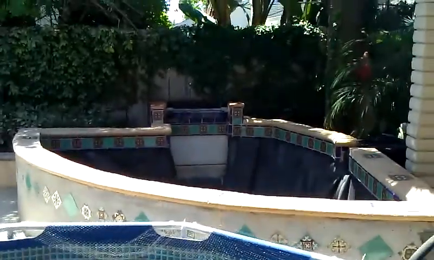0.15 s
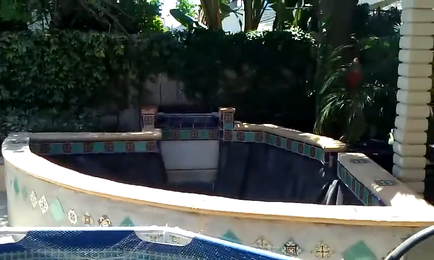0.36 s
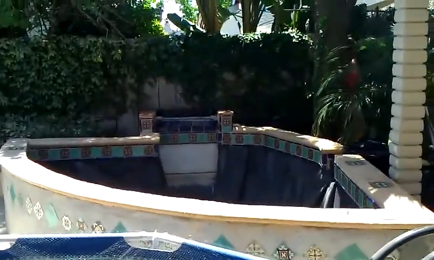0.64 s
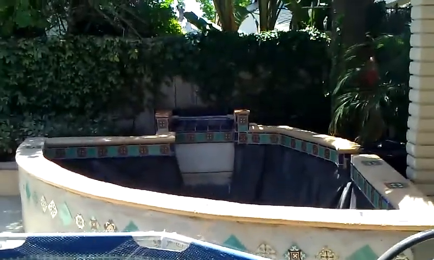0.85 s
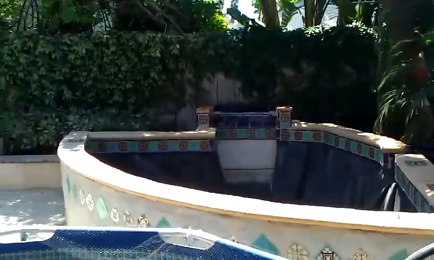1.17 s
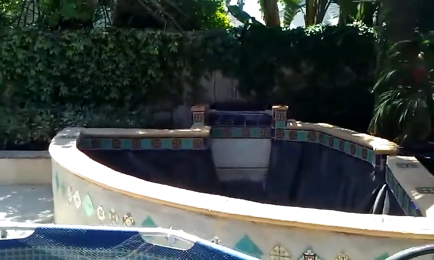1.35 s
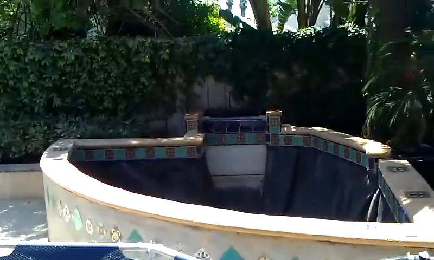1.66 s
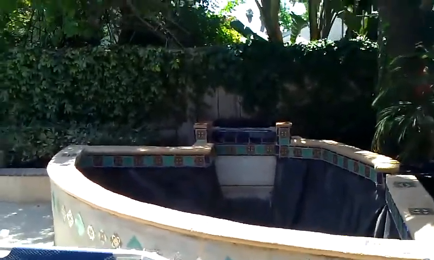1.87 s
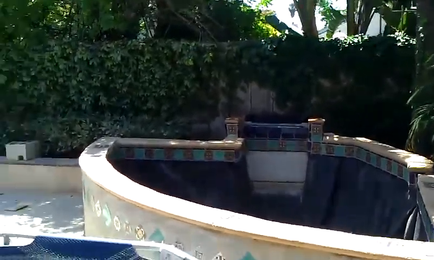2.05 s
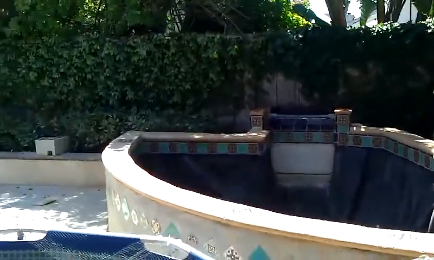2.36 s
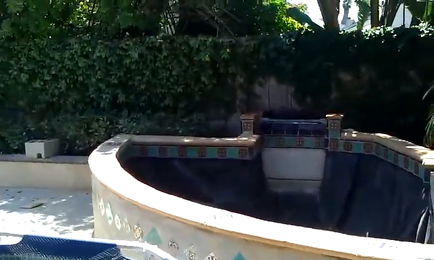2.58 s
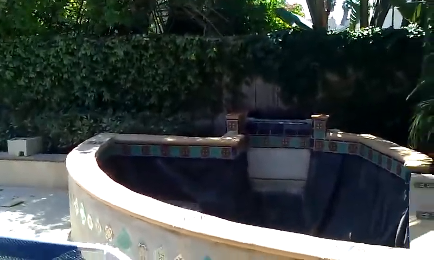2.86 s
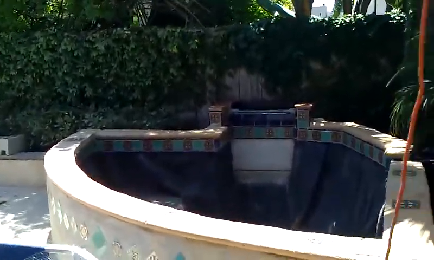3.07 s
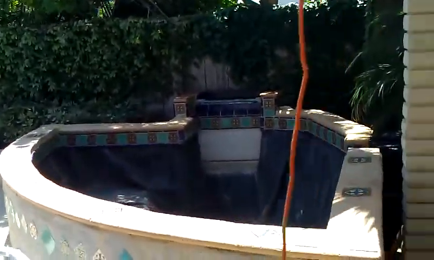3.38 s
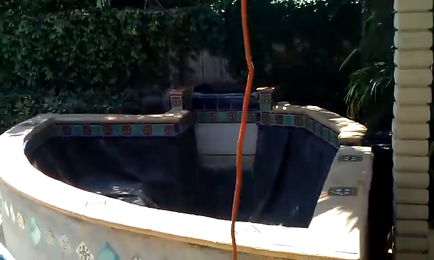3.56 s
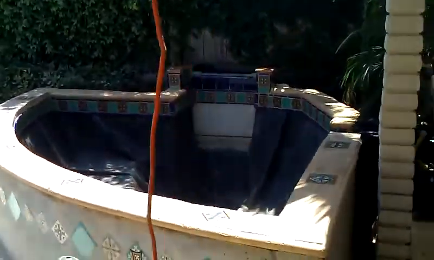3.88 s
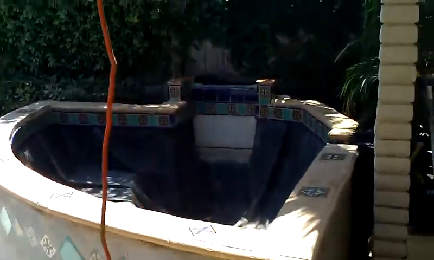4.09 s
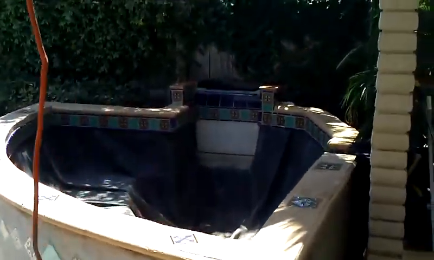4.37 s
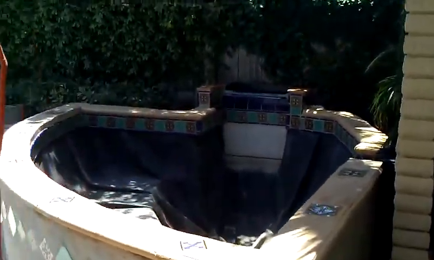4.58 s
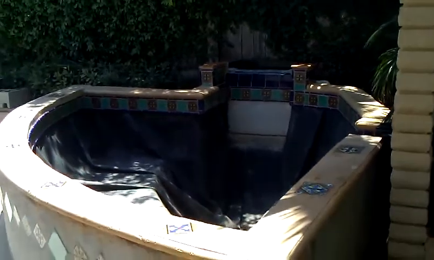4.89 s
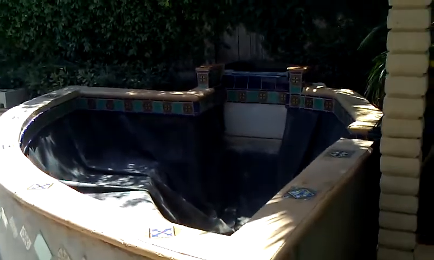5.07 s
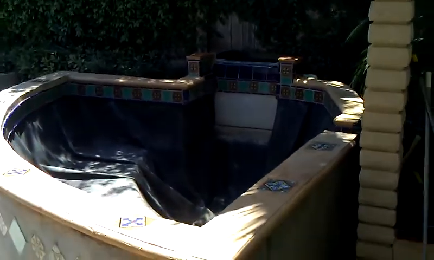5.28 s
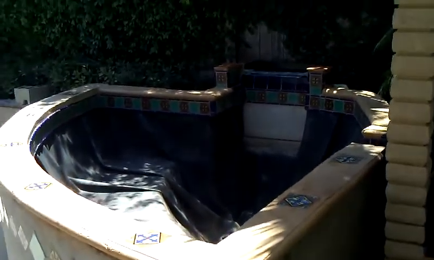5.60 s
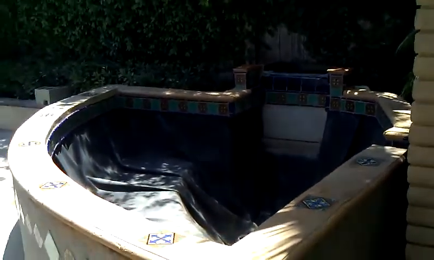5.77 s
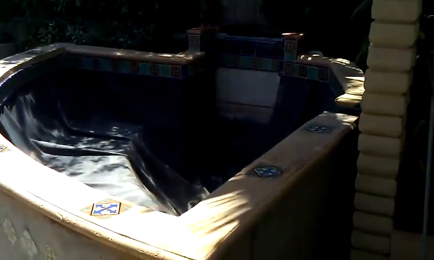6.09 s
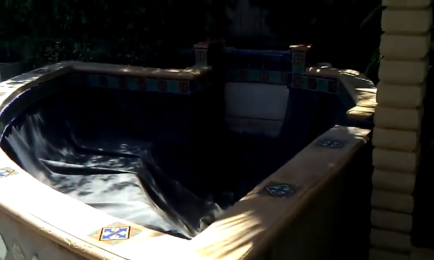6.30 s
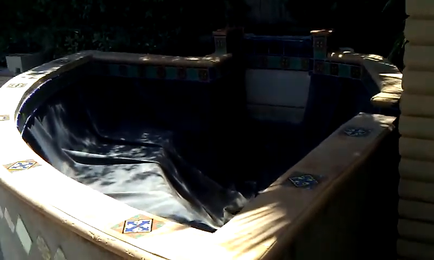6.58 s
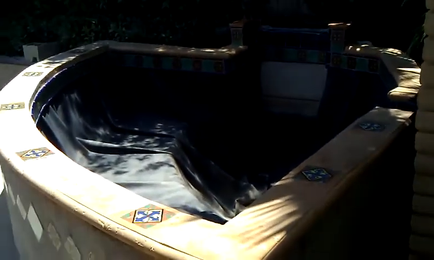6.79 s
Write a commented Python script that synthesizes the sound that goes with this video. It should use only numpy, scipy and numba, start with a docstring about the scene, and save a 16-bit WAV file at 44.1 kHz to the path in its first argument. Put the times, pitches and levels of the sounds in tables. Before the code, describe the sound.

A stream pours into a nearly empty lined garden pond, crackling with droplets and wet slaps over a faint pump hum. Between about one and three seconds, a close bird screeches three times, harsh and overloaded, echoing off patio walls. Slaps continue, a sharp tap sounds near four seconds, then the spatter recedes into softer pouring with plops and gurgles. Handheld microphone, moving.

```python
"""First one hears water pouring and spattering onto the liner of a garden pond while a pump hums.
The water is bubbly noise, showers of tiny fading sines, and bursts of noise for the slaps on the liner.
A parrot-like bird close by screeches three times, as rough harmonics and rasping noise that ring round
the patio and overload the microphone and its limiter. Later a sharp tap and a few fat drops stand out,
made of short ringing tones, and the spatter fades as the listener walks away from it."""
import sys
import numpy as np
from scipy import signal
from scipy.fft import rfft, irfft
from scipy.io import wavfile
from scipy.ndimage import uniform_filter1d
from numba import njit

SR = 44100
rng = np.random.default_rng(int(sys.argv[2]) if len(sys.argv) > 2 else 0)


def dump(signal):
    """Clip the signal to [-1, 1] and save it as 16-bit WAV at the path in sys.argv[1]."""
    limited = np.clip(np.atleast_2d(signal).T, -1, 1)
    pcm = np.round(limited * 32767).astype(np.int16)
    wavfile.write(sys.argv[1], SR, pcm)


N = 306054
TIME = np.arange(N) / SR

# Tone colour of the pouring stream: (frequency [Hz], relative level per Hz [dB])
POUR_COLOUR = [(30, -29), (90, -18), (150, -17.5), (210, -0.5), (350, 2), (520, -0.5), (700, -1),
               (1100, -1), (1800, 3), (2500, -2), (3200, -5), (4200, -3.5), (5600, -15.5), (8000, -33)]
# Tone colour of the spattering drops: (frequency [Hz], relative level per Hz [dB])
SPATTER_COLOUR = [(200, -30.5), (700, -11), (1500, -14.5), (2300, 2.5), (2750, -2), (3150, -1.5),
                  (3700, -1.5), (4250, 4.5), (4900, 0.5), (5700, -9), (6500, 7.5), (8300, -14.5)]
# Tone colour of the fine spray: (frequency [Hz], relative level per Hz [dB])
SPRAY_COLOUR = [(3000, -28.5), (5750, -22.5), (6200, -2.5), (6600, 1.5), (7200, 1), (8000, -3.5),
                (8600, -13)]
# Big slaps of water on the liner:
# (time [s], approximate peak [dB], splash relative to crack [dB], splash pitch [Hz])
SLAPS = [(0.045, -16, -14, 4540), (0.059, -29, -4, 5000), (0.092, -17.5, -8, 4530), (0.156, -14, -27, 4250),
         (0.2035, -15.5, -13, 4760), (0.2773, -16, -3, 4860), (0.32, -22, -19, 2400),
         (0.376, -20.5, -2.5, 3070), (0.4294, -33.5, 8, 4080), (0.441, -30, 8.5, 4850),
         (0.5701, -21, -2.5, 2770), (0.5877, -19.5, -1.5, 2600), (0.6565, -18, -6, 2500),
         (0.672, -23.5, -1, 4600), (0.7128, -31, 7, 2310), (0.729, -27, 1.5, 3400),
         (0.7394, -21.5, 3, 4400), (0.801, -17, -11, 3610), (0.8804, -24.5, 2, 2530),
         (1.0226, -14, -7, 4800), (1.043, -21.5, 1.5, 2560), (1.1478, -25.5, 3, 2040),
         (1.156, -22, -1, 4780), (1.2501, -29, 2, 1840), (1.29, -18.5, -3, 4350), (1.3367, -23, 2.5, 3460),
         (1.8695, -14.5, 0, 3970), (2.756, -11.5, -6.5, 4270), (2.8733, -13, -6.5, 4570),
         (2.9332, -20, -6, 2600), (2.9662, -18.5, -2, 4400), (3.0098, -17.5, -8, 2570),
         (3.0604, -16, -13, 4960), (3.1013, -14, -30, 2100), (3.1652, -12, -9, 4550),
         (3.428, -17, -13, 4400), (3.445, -15.5, -24, 4280), (3.541, -15.5, -16, 4300),
         (3.8664, -17, -11, 4350), (4.0776, -23, -22, 4200), (4.0885, -26, 4, 4230), (4.122, -32, 8, 4360),
         (4.17, -29, 3, 4400), (4.3132, -21.5, -13, 3490), (4.683, -30, -8, 2200),
         (5.172, -28.5, 2.5, 3400)]
# Tone colour of the crack in a slap: (frequency [Hz], relative level per Hz [dB])
CRACK_COLOUR = [(300, -18.5), (1200, -13.5), (2400, -1.5), (3200, -24.5),
                (4400, 2.0), (5600, -10.5), (6700, 8.5), (8300, -4.5)]
# Sharp ticks of drops on the liner, some alone and some within a slap:
# (time [s], level of the main ring [dB], pitch [Hz])
TICKS = [(0.5727, -22, 3050), (0.9757, -21.5, 3700), (1.26, -23.5, 4330), (1.2772, -26, 4300),
         (2.668, -19, 2600), (2.869, -25, 4400), (2.8755, -21, 4470), (2.892, -22, 4500),
         (3.205, -25, 4400), (3.2355, -23, 4400), (3.339, -27, 2380), (3.805, -22, 6660),
         (3.975, -27, 6500), (4.024, -29, 6900), (4.0785, -25, 7300), (4.0895, -20, 4500),
         (4.401, -27.5, 7300)]
# Ringing of the liner in each tick:
# (frequency [Hz], level relative to the main ring [dB], time to fade by 60 dB [s])
LINER_MODES = [(4500, -8, .003), (6900, 3.5, .004), (7600, -6, .003)]
# Screeches: (time [s], length [s], time until the tone locks in [s], time until it sags [s],
# top pitch [Hz], relative level [dB])
SCREECHES = [(1.355, 0.32, 0.067, 0.146, 2180, -0.3), (1.898, 0.313, 0.048, 0.15, 2200, 1.2),
             (2.246, 0.288, 0.036, 0.135, 2172, 1.4)]
# Strong and weak cycles of the voice alternate, adding half harmonics:
# (multiple of the pitch [-], relative level [dB])
SCREECH_HARMONICS = [(1, -22.5), (1.5, -29), (2, -9), (3, -8.5), (3.5, -23.5)]
# Tone colour of the rasp: (frequency [Hz], relative level per Hz [dB])
RASP_COLOUR = [(700, -26), (1600, -11.5), (2200, -3.5), (2700, -5), (3400, 3), (4300, 1), (5000, -0.5),
               (5700, -6), (6400, 1), (7200, 1.5), (8300, -24)]
# Tone colour of the frayed voice: (frequency [Hz], relative level per Hz [dB])
FRAY_COLOUR = [(700, -15), (1600, -11), (2600, -2), (3700, 1), (4900, 5.5), (5350, -6.5), (5650, -12),
               (7000, 5.5), (8100, -3), (8600, -3)]
# Fat drops: (time [s], level [dB], pitch [Hz], time to fade by 60 dB [s])
PLOPS = [(3.266, -27, 960, 0.021), (3.991, -42, 1560, 0.021), (4.38, -22, 760, 0.016),
         (4.423, -31.5, 1300, 0.031), (4.799, -25, 795, 0.018), (5.172, -30, 580, 0.017),
         (6.119, -35, 1520, 0.026), (6.62, -30, 1750, 0.029)]
# Gurgles, short runs of bubbles:
# (time [s], length [s], middle pitch [Hz], level before a boost and random bubble sizes [dB])
GURGLES = [(3.497, 0.045, 1700, -37.5), (4.57, 0.039, 1490, -40), (4.668, 0.051, 2300, -42),
           (4.715, 0.049, 4420, -44), (4.953, 0.055, 2100, -43), (5.028, 0.027, 3280, -40.5),
           (5.274, 0.054, 2760, -45), (5.488, .035, 4350, -43), (5.897, 0.055, 2880, -39),
           (6.097, 0.13, 1850, -43), (6.109, 0.039, 6540, -44), (6.165, 0.098, 3800, -43),
           (6.283, 0.2, 1790, -44), (6.576, 0.068, 3540, -44), (6.583, 0.023, 6850, -42)]
# Modes of the hard tap: (frequency [Hz], relative level [dB], time to fade by 60 dB [s])
TAP_MODES = [(990, -11.5, 0.033), (1630, 0.5, 0.0062), (2110, 0.5, 0.0027), (3030, -2.5, 0.0059),
             (4130, -5, 0.0045), (6700, -4, 0.0032)]
# Pump tones that swell as the listener passes: (frequency [Hz], top level before the ripple [dB],
# loudest at [s], fade to either side [dB/s], a crest of the ripple [s])
PUMP_TONES = [(277, -59.5, 3.9, 2.6, 0.74), (347.5, -57, 5.45, 7, 0.2)]
# Echoes from the basin walls: (delay [s], level [dB])
BASIN_ECHOES = [(.0047, -34.5), (0.0113, -9)]

# hum, and the ripple of the pump tones: wall echoes make standing waves along the walk
MAINS_HZ, MAINS_DB = 124, -75.5
RIPPLE_PERIOD_S, RIPPLE_ECHO = 1.36, .7
# water gains at the start of the walk
POUR_DB, DROPS_DB, SPRAY_DB, PING_DB = -47, -40.5, -48.5, -46.5
# the listener leaves the spatter behind: midpoint and time scale, then the losses
LEAVE_S, LEAVE_SPAN_S = 4.47, 0.75
DROPS_LOSS_DB, SPRAY_LOSS_DB, PING_LOSS_DB = 10, 6.5, 14
# on the way the spray comes into the open: moment and time scale, gain of spray and of pour
OPEN_S, OPEN_SPAN_S, SPRAY_OPEN_DB, POUR_OPEN_DB = 3.24, 0.9, 7, 0.5
# a slap is a short crack inside a patter of droplets
SLAP_RISE_S, SLAP_DECAY_S, PATTER_S, PATTER_DB = 0.0012, 0.0017, 0.0091, -6
# the first droplets land this long before the crack; droplets also make the level grainy
PATTER_LEAD_S, SLAP_GRAIN_DB = .011, 1.8
# small slaps fall at random: strongest peak before the walk's loss, range below it, relative splash level
SMALL_SLAP_DB, SMALL_SLAP_RANGE_DB, SMALL_SPLASH_DB = -25.5, 5.5, -0.5
SPLASH_LOW_HZ, SPLASH_HIGH_HZ = 1900, 4500
# the opening rasp swells, then drops to a trace under the tone
RASP_DB, RASP_GRAIN_DB, RASP_ATTACK_S, RASP_TRACE_DB = -20, 2.4, .07, -35
# the tone swells, tires steadily and is released
TONE_ATTACK_S, TONE_DB, TIRE_DB_PER_S, RELEASE_S = 0.088, 4.5, 25, 0.12
# a screech slides down from its top pitch: depth and duration of the slide
SAG_HZ, SAG_SPAN_S = 125, .1
# as it sags it frays: shreds, a second vibration that shakes the tone, added share of pitch jitter
FRAY_DB, FRAY_GRAIN_DB, BUZZ_HZ, BUZZ_RAD, FRAY_JITTER = -18.5, 4, 700, .12, .8
BUBBLES_PER_S, BUBBLE_OCTAVES = 500, .48
TAP_S, TAP_DB = 3.931, -15.5
# the input stage bends above a knee and flattens toward unequal rails (full scale 1)
KNEE, TOP_RAIL, BOTTOM_RAIL = .38, .67, .53
SCENE_TOP_HZ, TOP_HZ = 8350, 15700


def undb(db):
    """Turn decibels into a gain."""
    return 10 ** (np.asarray(db) / 20)


def unit(x):
    """Scale to an average strength (rms) of 1."""
    return x / np.sqrt(np.mean(x ** 2))


def add(out, s, x):
    """Mix x into out from time s."""
    i = max(int(s * SR), 0)
    out[i:i + len(x)] += x[:N - i]


def ramp(t, span):
    """Rise smoothly from 0 at t = 0 to 1 at t = span."""
    return np.sin(np.pi / 2 * np.clip(t / span, 0, 1)) ** 2


def walk(rate):
    """Wander at random: levels held for 1 / rate seconds, smoothed twice, rms 1."""
    k = max(int(SR / rate), 1)
    held = np.repeat(rng.standard_normal(N)[:N // k + 1], k)
    smooth = uniform_filter1d(uniform_filter1d(held, k), k)
    return unit(smooth[:N])


def colour(x, points):
    """Filter x through (Hz, dB) points, leaving the power of white noise unchanged."""
    hz, db = np.transpose(points)
    size = 2048
    log_hz = np.log(np.fft.rfftfreq(size, 1 / SR) + 1)
    log_gain = np.log(undb(np.interp(log_hz, np.log(hz), db)))
    # folding the cepstrum makes the filter react only after its input
    cepstrum = irfft(log_gain)[:size // 2]
    cepstrum[1:] *= 2
    response = irfft(np.exp(rfft(cepstrum, size)))
    return signal.fftconvolve(x, response / np.linalg.norm(response))[:len(x)]


def low_pass(x, hz):
    """Cut steeply above hz."""
    return signal.sosfilt(signal.ellip(10, .2, 80, hz, fs=SR, output="sos"), x)


def high_pass(x, hz):
    """Thin the sound below hz."""
    return signal.sosfilt(signal.butter(2, hz, "high", fs=SR, output="sos"), x)


def ring(hz, t60):
    """One struck tone that fades by 60 dB in t60 seconds."""
    t = np.arange(SR // 10) / SR
    return np.sin(2 * np.pi * hz * t) * np.exp(-np.log(1000) * t / t60)


@njit
def grains(starts, hz, cycles, sizes, glide):
    """Short fading sines whose pitch glides by the share glide over their life."""
    out = np.zeros(N)
    for k in range(len(starts)):
        n = int(cycles[k] * SR / hz[k]) + 2
        for i in range(min(n, N - starts[k])):
            age = i / n
            phase = 2 * np.pi * hz[k] * i / SR * (1 + glide * age / 2)
            # longer grains are made weaker so that length does not add energy
            out[starts[k] + i] += sizes[k] * np.exp(-5.5 * age) * np.sin(phase) / np.sqrt(n)
    return out


def droplets(count, low_hz, high_hz, cycles, spread_db, glide):
    """A shower of random droplets, many small and a few large; rms 1."""
    when, pitch, life, size, sign = rng.random((count, 5)).T
    starts = (when * N).astype(np.int64)
    hz = low_hz + (high_hz - low_hz) * pitch
    sizes = undb(-spread_db * np.log(size + 0.0043)) * np.sign(sign - .5)
    return unit(grains(starts, hz, cycles * (.5 + life), sizes, float(glide)))


def away(t):
    """How far the listener has left the spatter behind, 0-1."""
    return 1 / (1 + np.exp((LEAVE_S - t) / LEAVE_SPAN_S))


def in_open(t):
    """How directly the spray reaches the listener, 0-1."""
    return np.exp(-((t - OPEN_S) / OPEN_SPAN_S) ** 2)


def pour():
    """The stream churns the puddle: small bubbles over a smooth rush of noise."""
    bubbles = droplets(count=12000, low_hz=550, high_hz=4500, cycles=13, spread_db=2.8, glide=.06)
    rush = rng.standard_normal(N)
    churn = undb(-5.0) * bubbles * undb(2.0 * walk(25.26)) + rush
    return colour(churn, POUR_COLOUR) * undb(POUR_DB + POUR_OPEN_DB * in_open(TIME))


def spatter():
    """The stream breaks into clumps, each a crackle of droplets with fine spray."""
    clumps_db = 1.1 * walk(45) + 1.1 * walk(200)
    drops = droplets(count=20000, low_hz=510, high_hz=8370, cycles=12.7, spread_db=0.5, glide=0.022)
    spray = droplets(count=14000, low_hz=4900, high_hz=8860, cycles=11.0, spread_db=0.5, glide=0.022)
    # drops and spray share the clumps but also waver separately
    drops_db = DROPS_DB - DROPS_LOSS_DB * away(TIME) + .9 * walk(30)
    spray_db = SPRAY_DB - SPRAY_LOSS_DB * away(TIME) + SPRAY_OPEN_DB * in_open(TIME) + .9 * walk(33)
    crackle = colour(drops, SPATTER_COLOUR) * undb(drops_db + clumps_db)
    mist = colour(spray, SPRAY_COLOUR) * undb(spray_db + clumps_db)
    return crackle + mist


def pings():
    """Single drops trap a bubble, which rings briefly and rises in pitch."""
    low = droplets(count=480, low_hz=1800, high_hz=2800, cycles=28, spread_db=2.5, glide=.05)
    high = droplets(count=520, low_hz=2750, high_hz=5000, cycles=22, spread_db=2.8, glide=.05)
    return high_pass(low + undb(-8.0) * high, 820) * undb(PING_DB - PING_LOSS_DB * away(TIME))


def basin(x):
    """The near walls of the pond send the water back a moment later."""
    out = x.copy()
    for delay_s, db in BASIN_ECHOES:
        add(out, delay_s, undb(db) * x)
    return out


def pump():
    """Mains hum and two pump tones, all wavering; standing waves make the pump tones ripple."""
    tones = [(MAINS_HZ, undb(MAINS_DB))]
    for hz, db, loudest_s, fade, crest_s in PUMP_TONES:
        echo = RIPPLE_ECHO * np.exp(2j * np.pi * (TIME - crest_s) / RIPPLE_PERIOD_S)
        swell = undb(db - fade * np.abs(TIME - loudest_s))
        tones.append((hz, np.abs(1 + echo) * swell))
    out = np.zeros(N)
    for hz, gain in tones:
        waver = undb(2.5 * walk(11))
        out += np.sqrt(2) * gain * waver * np.sin(2 * np.pi * hz * TIME + 0.5 * walk(9))
    return out


def small_slaps(count):
    """Rows like those of the big slaps, for lesser clumps scattered through the scene."""
    when, size, pitch = rng.random((count, 3)).T
    s = (np.arange(count) + when) / count * N / SR
    db = SMALL_SLAP_DB - SMALL_SLAP_RANGE_DB * size - DROPS_LOSS_DB * away(s)
    splash_hz = SPLASH_LOW_HZ + (SPLASH_HIGH_HZ - SPLASH_LOW_HZ) * pitch
    return list(zip(s, db, np.full(count, SMALL_SPLASH_DB), splash_hz))


def slaps():
    """Clumps crack on the liner amid their own droplets; each splash rings at its own pitch."""
    lead_s = .02  # room before the crack for the first droplets
    t = np.arange(SR // 12) / SR - lead_s
    core = ramp(t, SLAP_RISE_S) * np.exp(-np.abs(t) / SLAP_DECAY_S)
    patter = ramp(t + PATTER_LEAD_S, PATTER_LEAD_S) * np.exp(-np.abs(t - 2 * SLAP_RISE_S) / PATTER_S)
    shape = core + undb(PATTER_DB) * patter
    force, splashes = np.zeros(N), np.zeros(N)
    for s, db, splash_db, hz in list(SLAPS) + small_slaps(count=45):
        add(force, s - lead_s, undb(db) * shape)
        noise = rng.standard_normal(len(t))
        splash = unit(signal.fftconvolve(noise, ring(hz, t60=.004))[:len(t)])
        add(splashes, s - lead_s, undb(db + splash_db) * shape * splash)
    crack = colour(rng.standard_normal(N), CRACK_COLOUR)
    beads = unit(undb(SLAP_GRAIN_DB * walk(1100)))
    return beads * (force * crack + splashes) / 2  # noise peaks at about twice its rms


def ticks():
    """Sharp ticks of drops on the liner, some alone and some within a slap, with a very short ring."""
    liner = sum(undb(db) * ring(hz, t60) for hz, db, t60 in LINER_MODES)
    out = np.zeros(N)
    for s, db, hz in TICKS:
        add(out, s, undb(db) * (ring(hz, t60=0.0081) + liner))
    return out


def bird():
    """A rasp locks onto a rough, fluttering tone; as its pitch sags, the tone frays into rasp again."""
    rasp = colour(rng.standard_normal(N), RASP_COLOUR) * undb(RASP_GRAIN_DB * walk(250))
    shreds = droplets(count=9000, low_hz=700, high_hz=8600, cycles=22, spread_db=2.5, glide=-.05)
    shreds = colour(shreds, FRAY_COLOUR) * undb(FRAY_GRAIN_DB * walk(140))
    jitter = .007 * walk(900) + .008 * walk(300) + .005 * walk(70)  # share of the pitch
    buzz_hz = BUZZ_HZ * (1 + .1 * walk(150))
    buzz = BUZZ_RAD * np.sin(2 * np.pi * np.cumsum(buzz_hz) / SR)
    # each harmonic flutters in level and phase: (roughness, rate in Hz)
    flutters = [np.sqrt(1 - 2 * rough ** 2) + rough * (walk(rate) + 1j * walk(rate))
                for rough, rate in ((.5, 420), (.66, 600), (.53, 560), (.45, 600), (.7, 1100))]
    out = np.zeros(N)
    for s, length, lock_s, sag_s, top_hz, db in SCREECHES:
        on = (TIME > s) & (TIME < s + length)
        age = TIME[on] - s
        locked = ramp(age - lock_s, TONE_ATTACK_S)
        frayed = ramp(age - sag_s, SAG_SPAN_S)
        hz = (top_hz - SAG_HZ * frayed) * (1 + (1 + FRAY_JITTER * frayed) * jitter[on])
        phase = 2 * np.pi * np.cumsum(hz) / SR + frayed * buzz[on]
        tone = np.zeros(len(age))
        for (k, k_db), flutter in zip(SCREECH_HARMONICS, flutters):
            multiple = round(2 * k) / 2  # to the nearest half
            tone += undb(k_db) * np.imag(flutter[on] * np.exp(1j * multiple * phase))
        tone_gain = locked * undb(TONE_DB - TIRE_DB_PER_S * (age - lock_s))
        rasp_gain = ramp(age, RASP_ATTACK_S) * undb(RASP_DB + (RASP_TRACE_DB - RASP_DB) * locked)
        voice = tone_gain * (tone + frayed * undb(FRAY_DB) * shreds[on]) + rasp_gain * rasp[on]
        out[on] += undb(db) * ramp(length - age, RELEASE_S) * voice
    return out


def echoes(x, t60, wet_db):
    """Hard walls return scattered echoes that die away."""
    t = np.arange(SR) / SR
    scatter = rng.standard_normal(SR) ** 3  # cubing makes a few echoes stand out
    response = scatter * np.exp(-np.log(1000) * t / t60) * (t > .004)
    return x + undb(wet_db) * signal.fftconvolve(x, response / np.linalg.norm(response))[:N]


def plops():
    """Fat drops fall into the puddle and ring briefly."""
    out = np.zeros(N)
    for s, db, hz, t60 in PLOPS:
        add(out, s, undb(db) * ring(hz, t60))
    return out


def gurgles():
    """Trapped air escapes as a run of bubbles of similar pitch."""
    out = np.zeros(N)
    for s, length, hz, db in GURGLES:
        bubbles = rng.random(size=(100, 3))[:int(length * BUBBLES_PER_S)]
        for when, pitch, size in bubbles:
            bubble_hz = hz * 2 ** (BUBBLE_OCTAVES * (pitch - .5))
            add(out, s + when * length, undb(db + 7.0) * size * ring(bubble_hz, t60=0.025))
    return out


def tap():
    """One hard tap rings a few quickly fading modes."""
    out = np.zeros(N)
    modes = sum(undb(db) * ring(hz, t60) for hz, db, t60 in TAP_MODES)
    add(out, TAP_S, undb(TAP_DB) * modes)
    return high_pass(out, 770)


def scene():
    """Mix the water in its basin, the hits, the pump and the echoing bird, then cut the upper treble."""
    water = basin(pour() + spatter() + pings())
    hits = high_pass(slaps() + ticks() + plops() + gurgles() + tap(), 300)
    dry = water + pump() + hits + echoes(bird(), t60=0.51, wet_db=-1.5)
    return low_pass(dry, SCENE_TOP_HZ)[None]


def overload(x):
    """The input stage rounds the peaks a little unevenly, adding overtones."""
    fine = signal.resample_poly(x, 2, 1)  # double rate leaves room for the overtones
    room = np.maximum(np.where(fine > 0, TOP_RAIL, BOTTOM_RAIL) - KNEE, 1e-3)
    straight = np.clip(fine, -KNEE, KNEE)
    bent = room * np.tanh((fine - straight) / room)
    return signal.resample_poly(straight + bent, 1, 2)


@njit
def follow(x, attack, release):
    """Track the level, rising fast and sinking slowly."""
    out, level = np.empty(len(x)), 0.
    for i in range(len(x)):
        level += (abs(x[i]) - level) * (attack if abs(x[i]) > level else release)
        out[i] = level
    return out


def limiter(x, ceiling_db, attack_s, release_s):
    """Turn the gain down while the tracked level is over the ceiling."""
    envelope = follow(x, 1 / (attack_s * SR), 1 / (release_s * SR))
    return x / np.maximum(envelope / undb(ceiling_db), 1)


def record(dry):
    """The microphone overloads, the limiter holds the level, the top is cut."""
    held = limiter(overload(dry[0]), ceiling_db=-14.5, attack_s=.0007, release_s=.018)
    return low_pass(held, TOP_HZ)[None]


dry = scene()
out = record(dry)
dump(out)
```